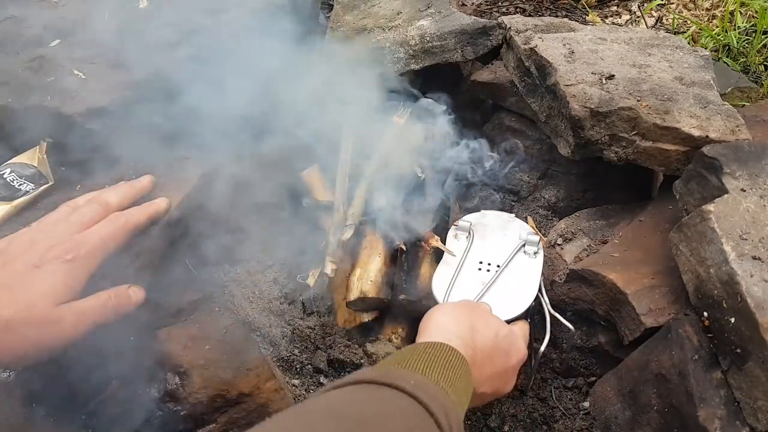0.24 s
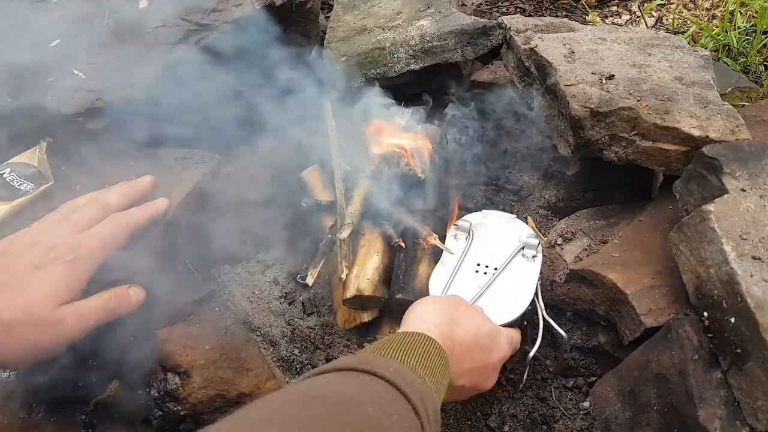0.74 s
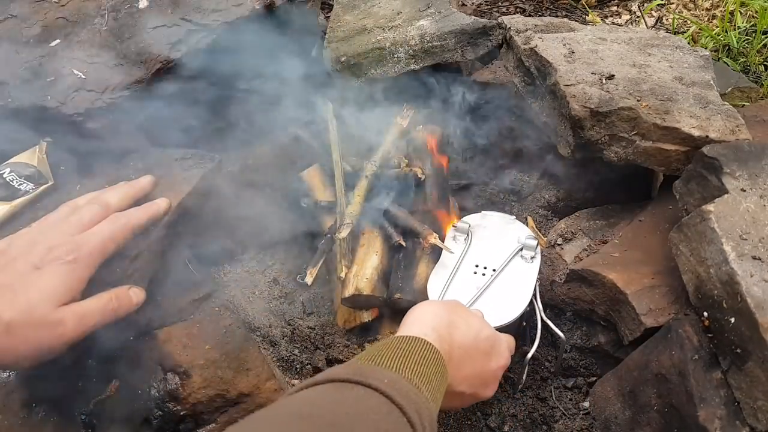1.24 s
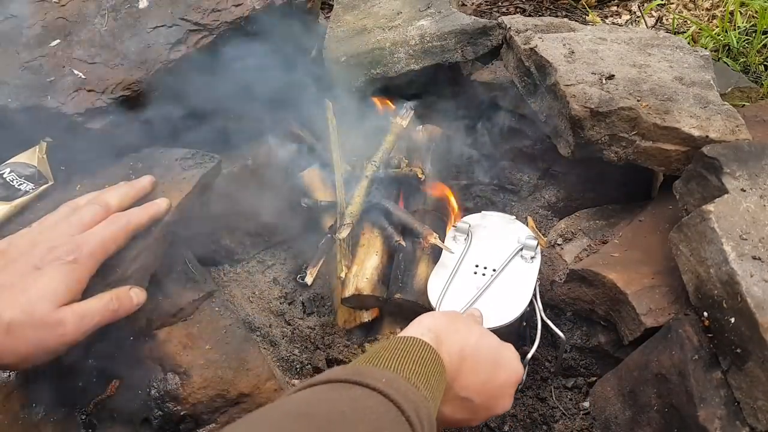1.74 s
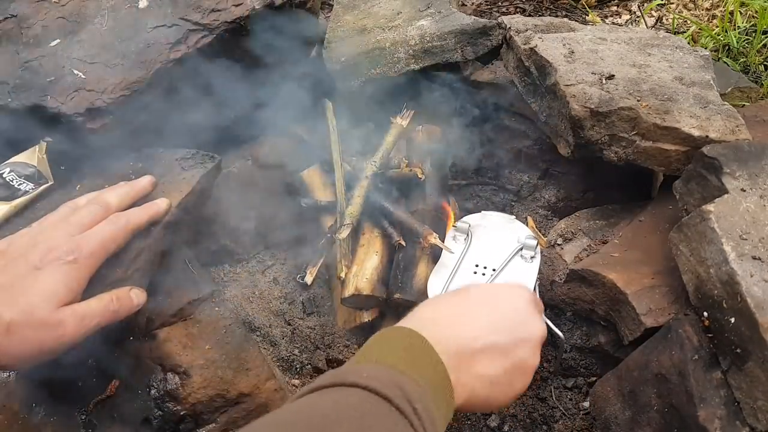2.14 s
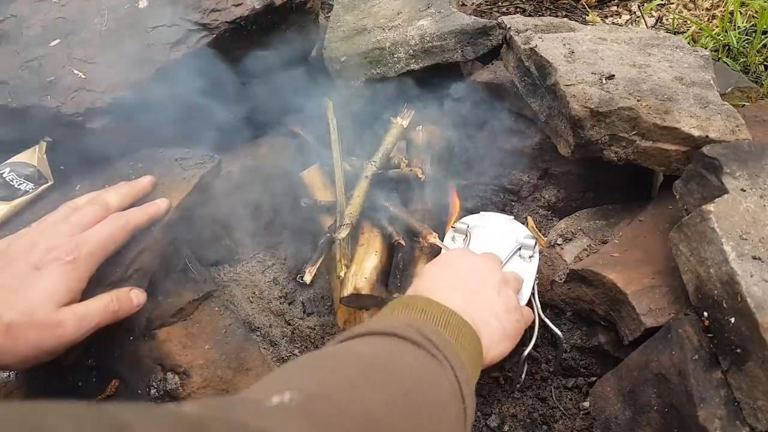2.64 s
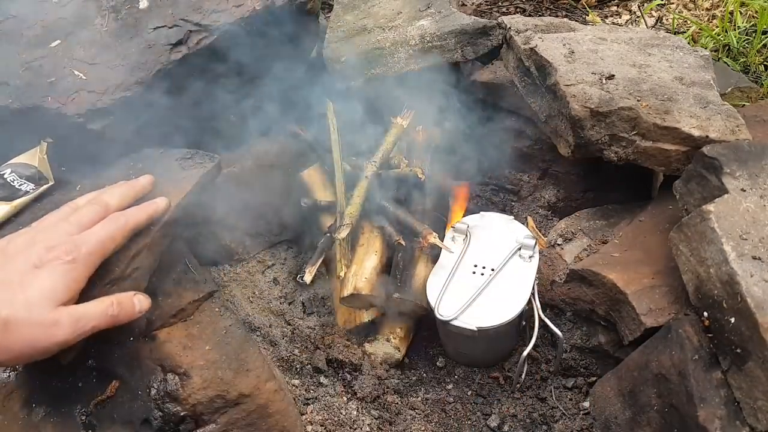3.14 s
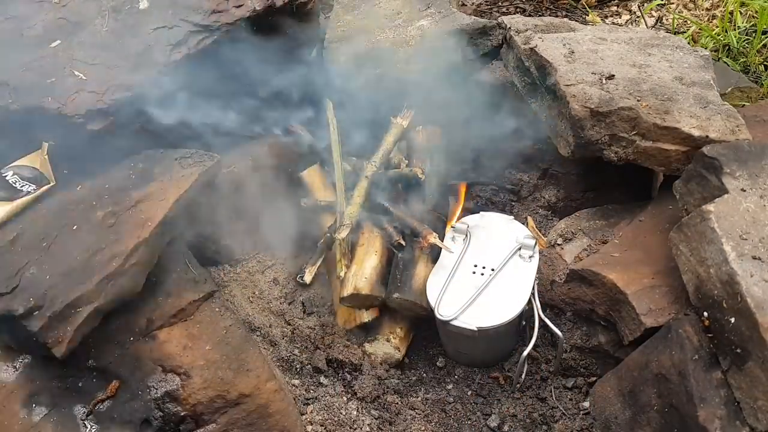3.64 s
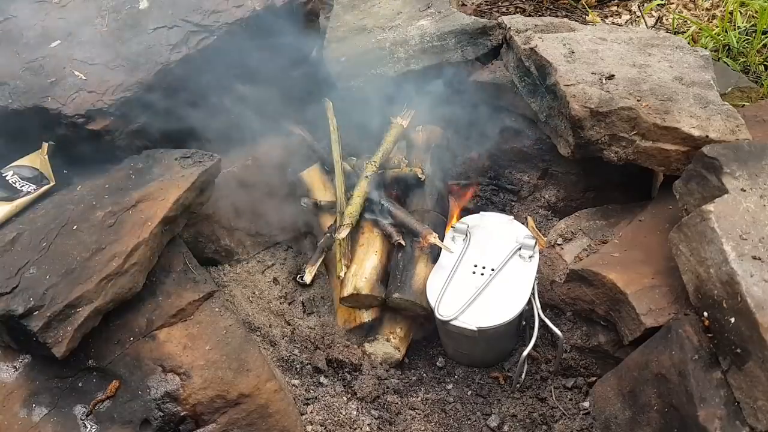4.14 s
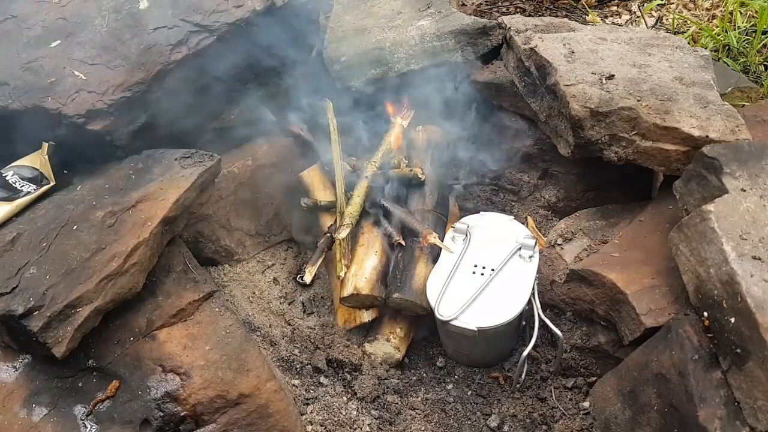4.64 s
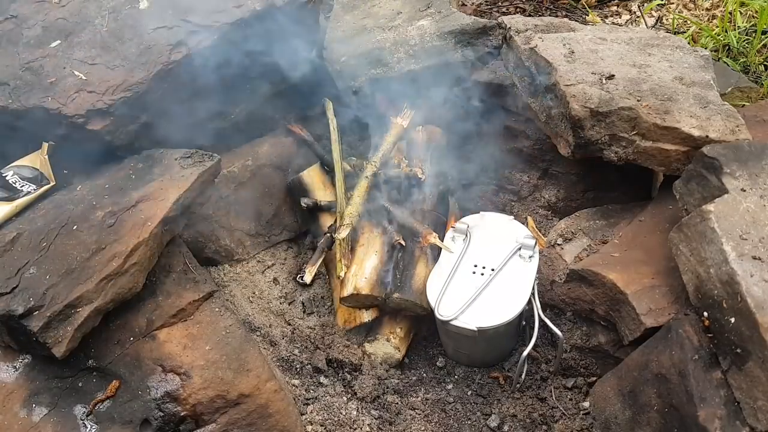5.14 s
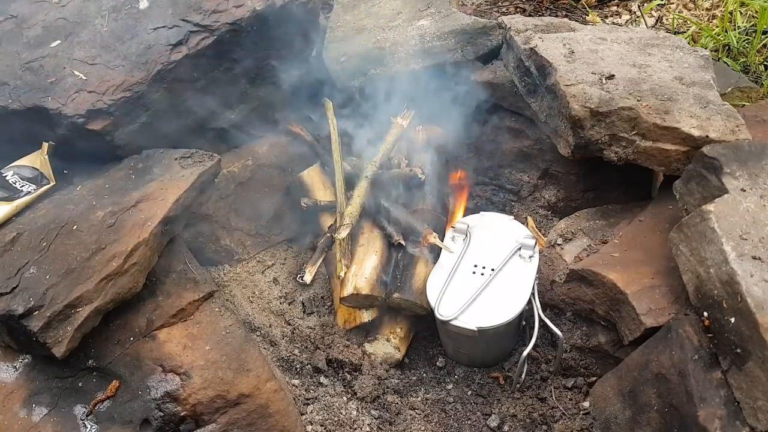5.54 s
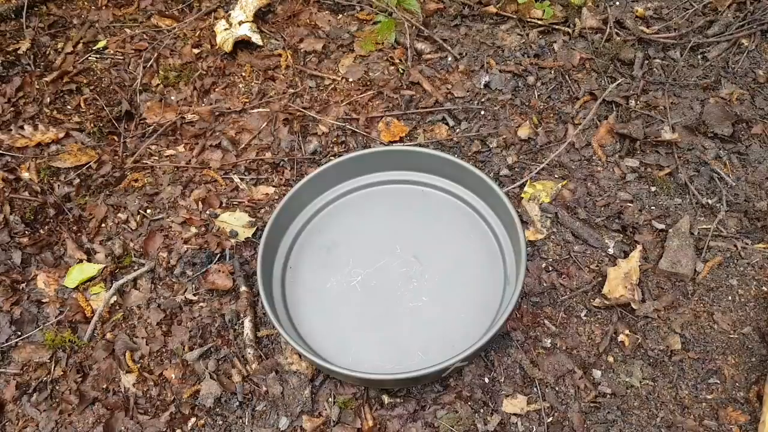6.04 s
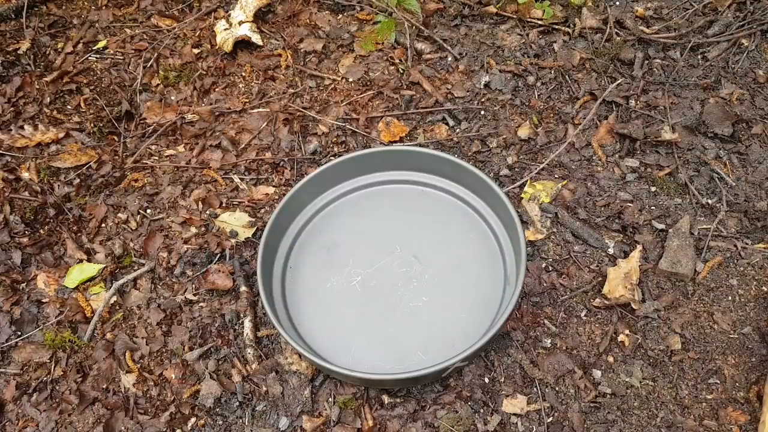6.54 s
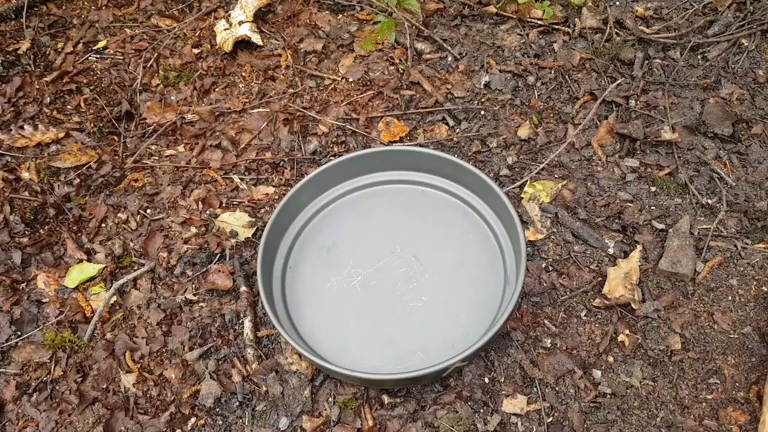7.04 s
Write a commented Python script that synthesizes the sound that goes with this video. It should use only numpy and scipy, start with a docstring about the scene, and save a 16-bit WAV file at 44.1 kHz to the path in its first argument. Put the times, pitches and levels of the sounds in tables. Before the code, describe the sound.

A small stick fire is heard close up outdoors in wide stereo: continuous bright hiss of steam from damp wood, with a faint low-mid rush and deep, irregular flutter of flames, strongest around 1.2 s. Soft touches come early; at 1.1 s a thin metal pot scrapes and knocks hollowly on stone. A rapid cluster of scuffs and damped clanks follows at 2.1 s, with lighter scrapes at 2.4 and 2.6 s. Faint bird pips sound near 2.8 s, and the hiss opens and brightens by 3 s. At 3.28 s a hand pats rock, a short, dull, low thump with a tiny tick. Only hiss, flutter and barely audible bumps continue, with a far dove's coo at 4.9 s. At 5.7 s the fire cuts off. After a short silence, a much quieter wood fades in by 6 s: airy hiss, leaves, distant rumble, thin falling bird whistles, and a crisp twig snap at 7.1 s.

```python
"""In a wood, a small stick fire hisses and flutters between stones while a hand shuffles a thin metal pot on them
and pats a rock. The fireside is cut off and a quieter spot fades in, with far hiss, leaves, rumble and a twig snap.
Fire and wood are coloured, patchy stereo noise. The pot is scraped noise plus damped ringing sines, the pats are
sagging low sines with grit, and the far birds and dove are gliding sines smeared by echoes."""
import sys
import numpy as np
from scipy import signal
from scipy.fft import rfft, irfft, next_fast_len
from scipy.io import wavfile
from scipy.ndimage import uniform_filter1d, map_coordinates

SR = 44100
rng = np.random.default_rng(int(sys.argv[2]) if len(sys.argv) > 2 else 0)


def materialize(psi):
    """Save the field psi as 16-bit PCM at rate SR to the path in sys.argv[1].

    A 1-D psi becomes a single channel; in a 2-D psi each row is a channel.
    """
    bounded = np.clip(np.atleast_2d(psi).T, -1, 1)
    quanta = np.round(bounded * 32767).astype(np.int16)
    wavfile.write(sys.argv[1], SR, quanta)


N = 321930
T = np.arange(N) / SR


def amp(db):
    """Decibels to gain."""
    return 10 ** (np.asarray(db) / 20)


def unit(x):
    """Scaled to rms 1."""
    return x / np.sqrt(np.mean(x ** 2) + 1e-20)


def along(points, hz):
    """Reads a curve of (frequency [Hz], value) points on a log frequency axis."""
    point_hz, value = np.transpose(points)
    return np.interp(np.log(hz + 1), np.log(point_hz + 1), value)


def curves(rows):
    """One value per sample for each column after the time."""
    s, *columns = np.transpose(rows)
    return [np.interp(T, s, column) for column in columns]


def wobble(rate):
    """A smooth random curve, rate knots a second."""
    knots = rng.standard_normal(int(N * rate / SR) + 4)
    return map_coordinates(knots, [T * rate])


def filtered(x, response):
    """x times a complex response of frequency."""
    m = next_fast_len(N + SR // 2)
    hz = np.fft.rfftfreq(m, 1 / SR)
    return irfft(rfft(x, m) * response(hz), m)[..., :N]


def rush(spectrum, alike, side, lead, patchy_db, size=1024):
    """Stereo noise, mid rms 1, with random gain patches; the right is a phase-shifted, partly different copy."""
    hz = np.fft.rfftfreq(size, 1 / SR)[:, None]
    shape = (size // 2 + 1, 2 * N // size + 3)
    a, b = rng.standard_normal((2, *shape)) + 1j * rng.standard_normal((2, *shape))
    # patches: random gains smoothed over frequency, then over time
    patches = uniform_filter1d(rng.standard_normal(shape), size=9, axis=0)
    patches = unit(uniform_filter1d(patches, size=3, axis=1))
    same = np.clip(along(alike, hz), 0, 1)
    right = same * np.exp(-1j * along(lead, hz)) * a + np.sqrt(1 - same ** 2) * b
    edged = [(0.84, -120)] + list(spectrum) + [(SR / 2, -120)]
    colour = amp(along(edged, hz) + patchy_db * patches)
    half_side_db = along(side, hz) / 2
    bins = colour * [a * amp(half_side_db), right * amp(-half_side_db)]
    window = np.sin(np.pi * np.arange(size) / size)
    pair = signal.istft(bins, window=window, nperseg=size)[1][:, :N]
    return pair / np.sqrt(np.mean(pair.mean(axis=0) ** 2))


def add(track, s, sound):
    """Mixes a short sound in at time s."""
    part = track[..., round(s * SR):][..., :sound.shape[-1]]
    part += sound[..., :part.shape[-1]]


# spectra of the quiet spot: (frequency [Hz], relative density [dB])
FAR_HISS_SPECTRUM = [(1290, -33), (2200, -17.5), (2410, -11), (3000, -5), (3260, -2.5), (4740, -3),
                     (6900, 2), (8200, -11), (11100, 0), (15500, -10.5)]
LEAVES_SPECTRUM = [(120, -24), (200, -1), (258, -5.5), (332, -9), (489, -6), (992, -8), (2800, -18.5),
                   (3640, -45.5), (6160, -120)]
RUMBLE_SPECTRUM = [(22, -35), (38, -29), (54, 2.5), (70, -2), (124, -7.5), (199, -21), (250, -24),
                   (320, -52.5), (550, -120)]
# how alike left and right are: (frequency [Hz], likeness [0-1])
QUIET_ALIKE = [(60, 0.89), (200, 0.94), (500, 0.54), (1400, 0.056), (4000, 0.07), (15000, 0.074)]
# stereo lean: (frequency [Hz], left minus right [dB])
QUIET_SIDE = [(60, 2.5), (180, 4.5), (550, 5.5), (1650, 3.5), (4970, 2.5), (15000, 7)]
# swell of the distant rumble: (time [s], level [dB])
RUMBLE_SWELL = [(6.7, -50.5), (7.08, -50), (7.3, -49.5)]
FAR_HISS_DB, LEAVES_DB = -56.5, -58.5


def quiet_wood():
    """Steady noise beds for far hiss and leaves, and a distant rumble whose level wanders."""
    stereo = (QUIET_ALIKE, QUIET_SIDE, [(1, 0)])  # neither side leads
    hiss = amp(FAR_HISS_DB) * rush(FAR_HISS_SPECTRUM, *stereo, patchy_db=1.0)
    leaves = amp(LEAVES_DB) * rush(LEAVES_SPECTRUM, *stereo, patchy_db=0.5)
    rumble_db, = curves(RUMBLE_SWELL)
    rumble = rush(RUMBLE_SPECTRUM, *stereo, patchy_db=0.7, size=4096)
    return hiss + leaves + amp(rumble_db + 1.9 * wobble(9.3)) * rumble


# the snap: (time [s], level of the noise before colouring [dB])
SNAP = [(7.1005, -33.5)]
# colour of the crack: (frequency [Hz], gain [dB])
TWIG_COLOUR = [(500, -37), (1500, -11), (4000, -10), (6500, 0), (8300, -3), (11500, 4.5), (15500, -11)]
SNAP_T60_S = 0.016


def twig_snap():
    """A breaking twig is a bright noise burst that dies at once, leaning slightly right."""
    cracks, t = np.zeros((2, N)), T[:SR // 10]
    for s, db in SNAP:
        noise = rng.standard_normal(len(t)) + 0.85 * rng.standard_normal((2, len(t)))
        add(cracks, s, amp(db - 60 * t / SNAP_T60_S) * noise)
    return filtered(cracks, lambda hz: amp(along(TWIG_COLOUR, hz) + np.array([[-1.2], [1.2]])))


def whistle(notes, edge, blur):
    """Gliding sine notes with soft ends (edge in s), smeared by echoes among the trees (blur is their gain)."""
    out, t = np.zeros((2, N)), T[:SR // 5]
    for corners in notes:
        s, hz, db = np.transpose(corners)
        at = np.arange(s[0], s[-1], 1 / SR)
        gate = np.clip(np.minimum(at - s[0], s[-1] - at) / edge, 0, 1)
        turns = np.cumsum(np.interp(at, s, hz)) / SR
        level = np.sqrt(2) * amp(np.interp(at, s, db))  # rms to sine peak
        note = level * gate * np.sin(2 * np.pi * turns)
        tail = rng.standard_normal((2, len(t))) * amp(-60 * t / 0.3)
        tail = tail / np.linalg.norm(tail[0])
        add(out, s[0], note * amp([[1.5], [-1.5]]))
        add(out, s[0], blur * signal.fftconvolve(note[None], tail, axes=1))
    return out


# short level notes: (time [s], length [s], pitch [Hz], rms level [dB], bend at the end [Hz])
PIPS = [(2.808, 0.023, 3650, -50.5, 280), (2.828, 0.018, 3600, -51, -20), (2.86, 0.034, 3730, -52, 200),
        (2.958, .042, 3790, -53.5, -80), (6.098, .027, 4380, -62, -20), (6.175, .025, 4650, -57, -20),
        (6.23, .045, 4350, -64, -20), (7.265, 0.028, 4950, -61, -150)]
PIP_DROP_HZ, PIP_DROP_S, PIP_FLICK_S = 378, 0.01, 0.011  # drops onto its pitch, bends away at the end
PIP_START_DB, PIP_SAG_DB, PIP_END_DB = -12, -5, -8  # against the note's level
# falling notes: (time of the top [s], top pitch [Hz], rms level [dB], rise [s], tail [s])
SWEEPS = [(6.724, 4950, -65, .015, .012), (6.85, 4750, -62, .017, .022), (7.056, 4750, -61, 0.0242, .044),
          (7.198, 4700, -60, .013, .021)]
SWEEP_RISE_HZ_PER_S, SWEEP_FALL_S, SWEEP_FALL_HZ, SWEEP_END_HZ = 13400, 0.0138, 580, 3980
SWEEP_START_DB, SWEEP_END_DB = -5, -8  # against the note's level


def birds():
    """Small birds whistle pips and falling sweeps, each kind with one shape of (s, Hz, dB) corners."""
    pips = []
    for s, length, hz, db, bend_hz in PIPS:
        settled = s + min(PIP_DROP_S, length / 2)
        flick = s + max(length - PIP_FLICK_S, length / 2)
        pips.append([(s, hz + PIP_DROP_HZ, db + PIP_START_DB), (settled, hz, db),
                     (flick, hz, db + PIP_SAG_DB), (s + length, hz + bend_hz, db + PIP_END_DB)])
    sweeps = []
    for s, hz, db, rise, tail in SWEEPS:
        fallen = s + SWEEP_FALL_S
        sweeps.append([(s - rise, hz - SWEEP_RISE_HZ_PER_S * rise, db + SWEEP_START_DB), (s, hz, db),
                       (fallen, hz - SWEEP_FALL_HZ, db), (fallen + tail, SWEEP_END_HZ, db + SWEEP_END_DB)])
    flicker = amp(1.8 * wobble(120))  # far notes flicker through the leaves
    return flicker * (whistle(pips, edge=0.0028, blur=0.66) + whistle(sweeps, edge=0.004, blur=1.0))


DOVE_S, DOVE_LENGTH_S, DOVE_SWELL_S = 4.9, 0.406, 0.054
DOVE_HZ, DOVE_RISE_HZ = 317, 17
DOVE_DB, DOVE_START_DB, DOVE_FADE_DB = -62, -6, -5.5  # rms level; start and end against it


def dove():
    """A far dove gives one low coo, a sine that swells, then fades as its pitch creeps up."""
    coo = [(DOVE_S, DOVE_HZ, DOVE_DB + DOVE_START_DB),
           (DOVE_S + DOVE_SWELL_S, DOVE_HZ, DOVE_DB),
           (DOVE_S + DOVE_LENGTH_S, DOVE_HZ + DOVE_RISE_HZ, DOVE_DB + DOVE_FADE_DB)]
    return whistle([coo], edge=0.04, blur=0.27)


# fire, left against right: (frequency [Hz], likeness [0-1])
FIRE_ALIKE = [(60, 1), (200, 0.89), (500, 0.35), (1400, 0.54), (3100, 0.49), (6800, 0.39), (12000, 0.29)]
# stereo lean: (frequency [Hz], left minus right [dB])
FIRE_SIDE = [(60, 3.5), (150, 5.0), (380, 7), (950, 4.5), (2380, 4), (5980, 2), (15000, -2)]
# phase between the sides: (frequency [Hz], lead of the left [rad])
FIRE_LEAD = [(0, 2), (520, -0.65), (2240, -5.5), (3190, -8), (7060, -5), (8610, -6), (12100, -3),
             (16000, -6)]
FIRE_STEREO = (FIRE_ALIKE, FIRE_SIDE, FIRE_LEAD)
# steam from damp sticks, in the clear and shaded by an arm: (frequency [Hz], relative density [dB])
CLEAR_HISS_SPECTRUM = [(1060, -40), (1800, -18.5), (2560, -11), (3320, -3.5), (3630, -6), (4680, -3.5),
                       (5910, -4.5), (7470, -0.5), (8480, -9.5), (9620, -4), (10900, 2.5), (12600, 0.5),
                       (15500, -10)]
SHADED_HISS_SPECTRUM = [(1060, -52.5), (1800, -18.5), (2850, -10.5), (3290, -4.5), (3600, -9.5),
                        (4160, -4.5), (5260, -7), (6410, -2.5), (7020, 2), (8100, -11.5), (11600, 2),
                        (14800, -5.5), (15500, -7)]
# loudness of the hiss before its random wobble: (time [s], level [dB])
STEAM_LEVEL = [(0.0, -49), (2.1, -48.5), (2.6, -50.5), (2.85, -50), (2.98, -47), (5.6, -48)]
ARM_LEAVES_S, ARM_GONE_S = 2.85, 2.95


def steam():
    """Steam hisses from damp sticks as bright noise; its colour crossfades as a shading arm moves away."""
    hiss_db, = curves(STEAM_LEVEL)
    clear = np.interp(T, (ARM_LEAVES_S, ARM_GONE_S), [0, np.pi / 2])  # equal-power crossfade angle
    shaded_hiss = np.cos(clear) * rush(SHADED_HISS_SPECTRUM, *FIRE_STEREO, patchy_db=1.5)
    clear_hiss = np.sin(clear) * rush(CLEAR_HISS_SPECTRUM, *FIRE_STEREO, patchy_db=1.5)
    return amp(hiss_db + 0.99 * wobble(6.4)) * (shaded_hiss + clear_hiss)


# flame noises: (frequency [Hz], relative density [dB])
RUSH_SPECTRUM = [(150, -31), (250, -7), (428, -0.5), (588, -5.5), (870, -2), (1870, -12.5), (2200, -19.5),
                 (2860, -41.5), (4840, -120)]
FLUTTER_SPECTRUM = [(22, -31), (38, -1.5), (54, 4), (113, 2), (152, -4), (209, -7), (300, -14),
                    (390, -34.5), (660, -120)]
# loudness of the flames before their random wobble: (time [s], rush level [dB], flutter level [dB])
FLAME_LEVELS = [(0.0, -62, -55), (0.4, -63.5, -58.5), (0.8, -64, -54), (1.21, -62.5, -49.5),
                (1.7, -65, -54.5), (2.05, -62.5, -52.5), (3.0, -63, -54), (3.45, -58, -52.5),
                (4.4, -60, -52), (4.9, -61.5, -53.5), (5.5, -60.5, -52)]


def flames():
    """Flames rush as low-mid noise and flutter in low puffs, the flutter wobbling faster than the rush."""
    rush_db, flutter_db = curves(FLAME_LEVELS)
    rushing = rush(RUSH_SPECTRUM, *FIRE_STEREO, patchy_db=1.5)
    flutter = rush(FLUTTER_SPECTRUM, *FIRE_STEREO, patchy_db=0.24, size=4096)
    return amp(rush_db + 0.75 * wobble(7.6)) * rushing + amp(flutter_db + 1.2 * wobble(20)) * flutter


def pushes(rows, base_hz, grit_db):
    """Contacts with no ring: a short sine sagging from 1.26 to 0.26 of base_hz as contact spreads, plus dull grit."""
    out, t = np.zeros(N), T[:SR // 8]
    pitch_hz = base_hz * (0.26 + 1.0 * np.exp(-t / 0.0022))
    turns = np.cumsum(pitch_hz) / SR
    for s, db, t60 in rows:
        grit = uniform_filter1d(rng.standard_normal(len(t)), size=15)
        grit = amp(grit_db) * unit(uniform_filter1d(grit, size=15))
        attack = (1 - np.exp(-t / (0.02 * t60))) ** 2  # longer pushes start softer
        add(out, s, amp(db - 60 * t / t60) * attack * (np.sin(2 * np.pi * turns) + grit))
    return out * amp([[3.3], [-3.3]])


# soft low thumps, the loud one patting the rock: (time [s], level before panning [dB], t60 [s])
THUMPS = [(0.2718, -40.5, 0.03), (0.679, -42, 0.036), (2.201, -42, 0.032), (3.2773, -15, 0.029),
          (3.31, -36, .09), (3.326, -40, 0.028), (4.22, -40.5, 0.05), (4.305, -38, 0.12),
          (5.098, -43, 0.064), (5.291, -45, 0.12), (5.466, -45, 0.058), (5.509, -40, 0.098)]
# a small hard tick after the pat: (time [s], level before panning [dB], t60 [s])
TICKS = [(3.2884, -35.5, 0.0091)]


def thumps():
    """The hand's soft thumps are low and nearly pure; the tick is higher and grittier."""
    return pushes(THUMPS, base_hz=465, grit_db=-32) + pushes(TICKS, base_hz=2040, grit_db=-7)


# the pot touches stone: (time [s], scrape level [dB], hollow knock level [dB], wall ring level [dB])
POT_TOUCHES = [(.27, -44.5, -44, -53.5), (1.0171, -34, -52.5, -66), (1.115, -18, -24, -39),
               (1.1235, -32, -47.5, -42.5), (1.8527, -46, -38, -66), (2.1081, -29.5, -34.5, -43),
               (2.115, -17.5, -26, -32.5), (2.1205, -25, -33.5, -36.5), (2.1271, -21, -33, -37),
               (2.1329, -19.5, -26, -40), (2.141, -26, -32, -48), (2.4124, -31, -51, -67),
               (2.4183, -36.5, -63, -71), (2.4222, -36, -58, -70), (2.5733, -26.5, -40, -63),
               (3.6284, -47, -45, -57)]
# air and base of the pot: (frequency [Hz], level [dB], t60 [s])
HOLLOW_MODES = [(305, 0, 0.085), (225, -5, 0.03), (375, 1, 0.028), (537, -11, .02)]
# pot wall damped by the hand, before random detune and strength: (frequency [Hz], level [dB], t60 [s])
WALL_MODES = [(956, -3.5, .03), (1202, -0.5, 0.033), (1402, -0.5, 0.044), (1640, -8, 0.06),
              (1855, -12.5, 0.06), (2397, -8.5, 0.056), (3305, -5.5, 0.087), (4460, -7, 0.033),
              (5700, -19, 0.024), (6200, -12, 0.019)]
# colour of the scrape: (frequency [Hz], gain [dB])
SCRAPE_COLOUR = [(150, -32.5), (300, -2), (700, -12), (1400, -4.5), (2200, -12.5), (3400, -10.5),
                 (7000, -5), (8500, -15.5), (11500, -4), (15500, -25.5)]
SCRAPE_T60_S = 0.035
KNOCK_LAG_S = 0.0014  # the hollow answers just after the touch
# the more the scrape tops the knock, the more glancing the touch
GLANCE_FROM_DB, GLANCE_SPAN_DB, GLANCE_MOST = 6, 16.5, 0.78


def wall_ring(t):
    """The thin wall rings as damped sines; the grip of the hand detunes it a little at each touch."""
    ring = np.zeros(len(t))
    for hz, db, t60 in WALL_MODES:
        level = amp(db + rng.normal(0, 1.36) - 60 * t / t60)
        ring += level * np.sin(2 * np.pi * (hz * rng.normal(1, 0.032) * t + rng.random()))
    return ring


def hollow_knock(t):
    """The hollow body knocks as low damped sines at fixed pitches."""
    return sum(amp(db - 60 * t / t60) * np.sin(2 * np.pi * hz * t) for hz, db, t60 in HOLLOW_MODES)


def pot():
    """Each touch scrapes briefly, rings the thin wall at new strengths and knocks the hollow body."""
    grit, body, t = np.zeros((2, N)), np.zeros(N), T[:SR // 5]
    onset = 1 - np.exp(-t / 0.0012)
    swell = 1 - np.exp(-t / 0.0019)  # the hollow body takes a moment to answer
    knock = hollow_knock(t)
    for s, scrape_db, knock_db, ring_db in POT_TOUCHES:
        glance = np.clip((scrape_db - knock_db - GLANCE_FROM_DB) / GLANCE_SPAN_DB, 0, GLANCE_MOST)
        noise = rng.standard_normal(len(t)) + 1.46 * rng.standard_normal((2, len(t)))
        noise = noise - glance * np.roll(noise, 1, axis=1)  # a glancing touch thins the bass
        add(grit, s, amp(scrape_db - 60 * t / SCRAPE_T60_S) * onset * noise)
        add(body, s, onset * amp(ring_db) * wall_ring(t))
        add(body, s + KNOCK_LAG_S, -swell * amp(knock_db) * knock)

    def scrape_response(hz):
        """Colours the scrape and leans its bass far left, its top slightly right."""
        left_minus_right_db = along([(300, 24.0), (1500, -2.0), (4000, 3.0), (12000, -4.5)], hz)
        return amp(along(SCRAPE_COLOUR, hz) + np.outer([0.5, -0.5], left_minus_right_db))

    return filtered(grit, scrape_response) + body * amp([[3.5], [-3.5]])


# the fireside is cut off: (time [s], gain [dB])
CUT = [(5.704, 0.5), (5.71, -29.5), (5.717, -34), (5.731, -57)]
FADE_FROM_S, FADE_TO_S, FADE_POWER = 5.75, 5.998, 2.23


def scene():
    """The fireside is cut off; after a short silence the quiet spot fades in, birds calling in both."""
    before = amp(curves(CUT)[0]) * (T < CUT[-1][0])
    after = np.interp(T, (FADE_FROM_S, FADE_TO_S), [0, 1]) ** FADE_POWER
    quiet_spot = quiet_wood() + twig_snap()
    fireside = steam() + flames() + thumps() + pot()
    return after * quiet_spot + birds() + dove() + before * fireside


LOW_CUT_HZ, TOP_HZ = 25, 15600


def record(dry):
    """Rolls off the deepest bass and keeps nothing from the band limit up."""
    return filtered(dry, lambda hz: (hz < TOP_HZ) * hz ** 2 / np.sqrt(hz ** 4 + LOW_CUT_HZ ** 4))


dry = scene()
out = record(dry)
materialize(out)
```